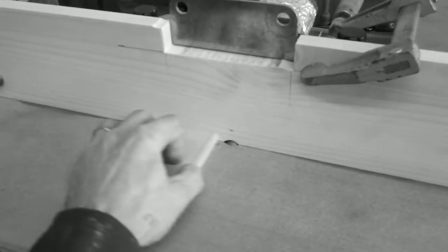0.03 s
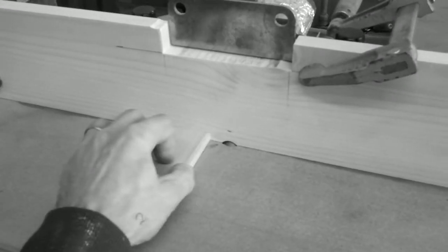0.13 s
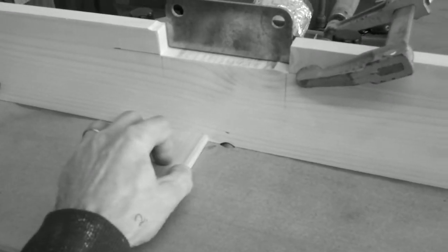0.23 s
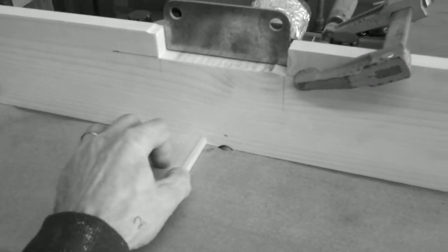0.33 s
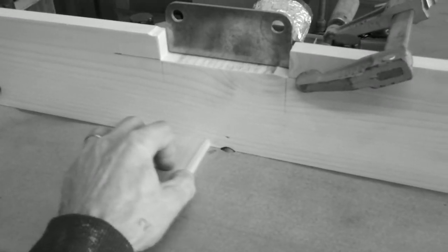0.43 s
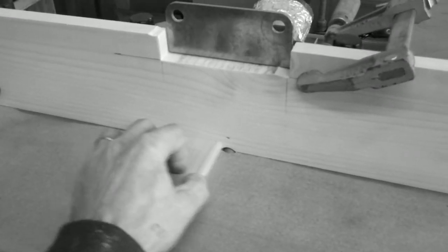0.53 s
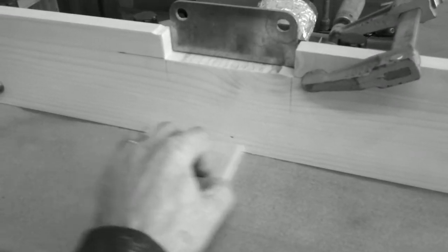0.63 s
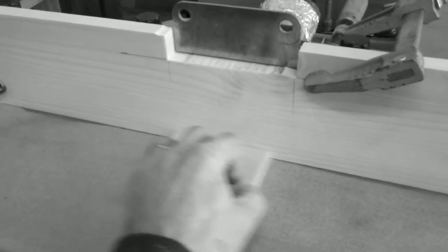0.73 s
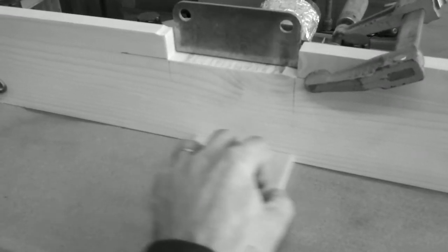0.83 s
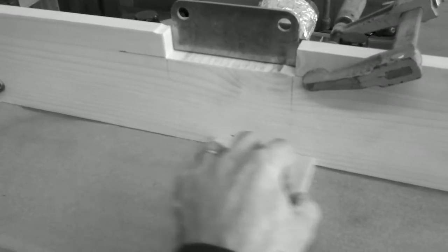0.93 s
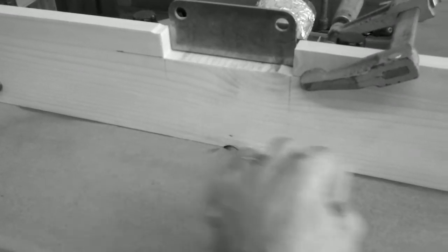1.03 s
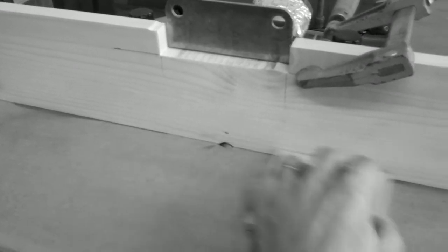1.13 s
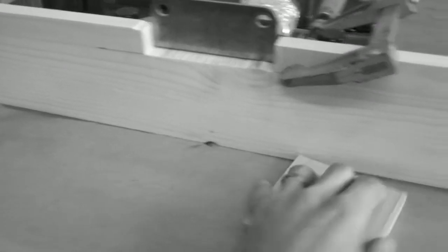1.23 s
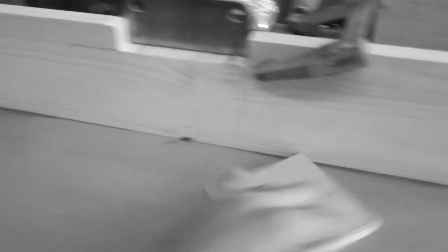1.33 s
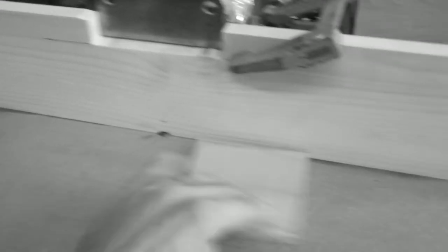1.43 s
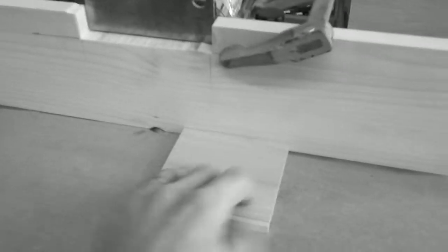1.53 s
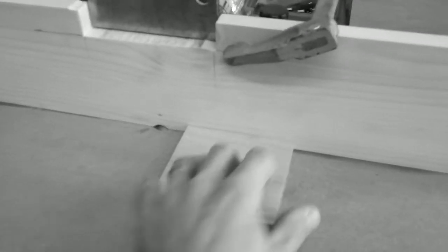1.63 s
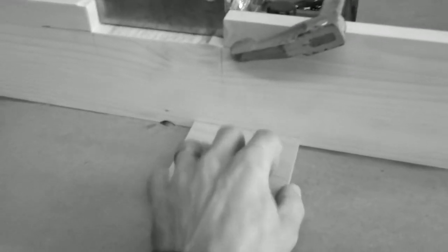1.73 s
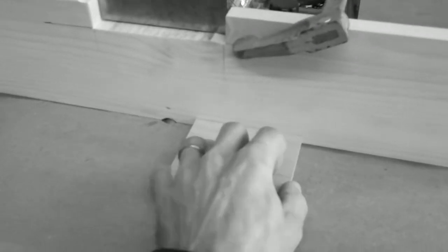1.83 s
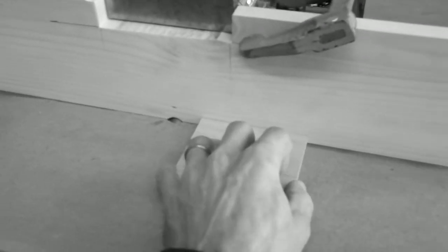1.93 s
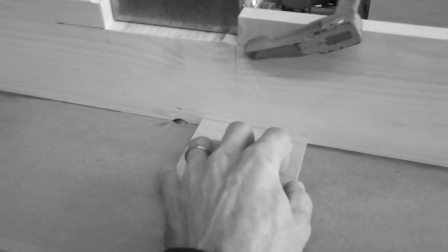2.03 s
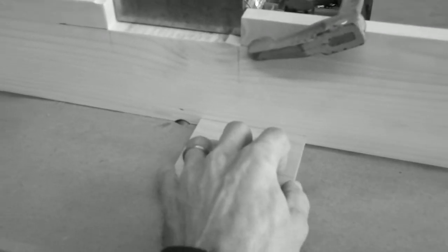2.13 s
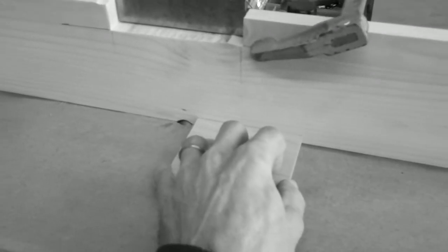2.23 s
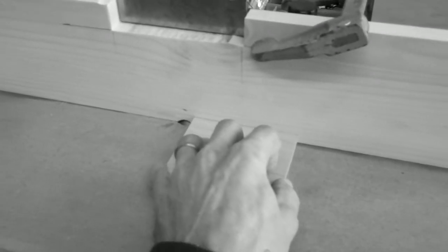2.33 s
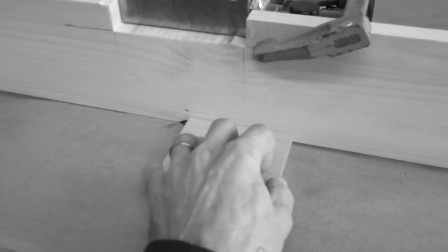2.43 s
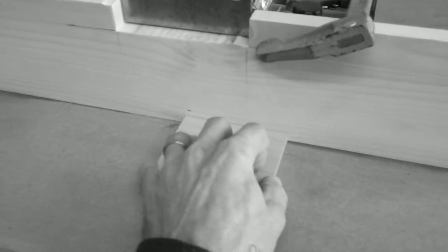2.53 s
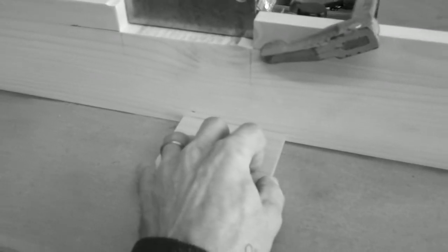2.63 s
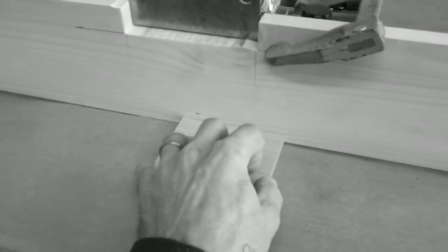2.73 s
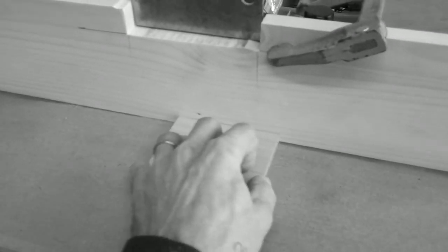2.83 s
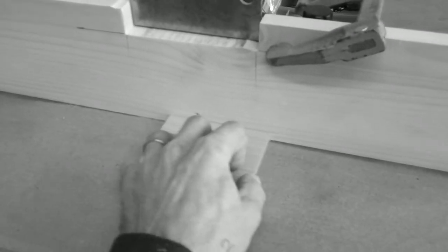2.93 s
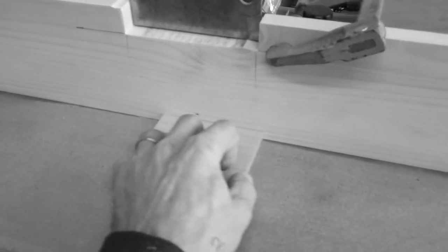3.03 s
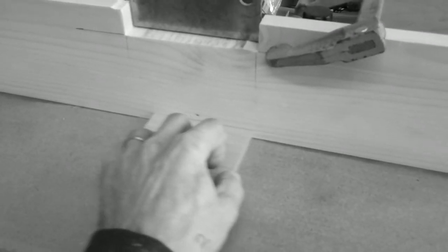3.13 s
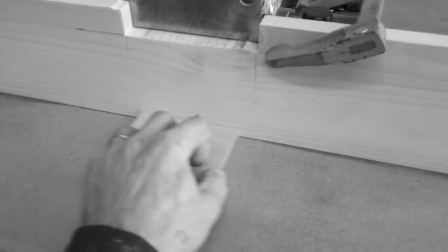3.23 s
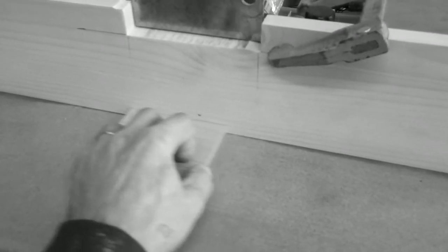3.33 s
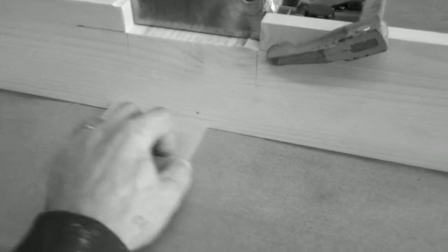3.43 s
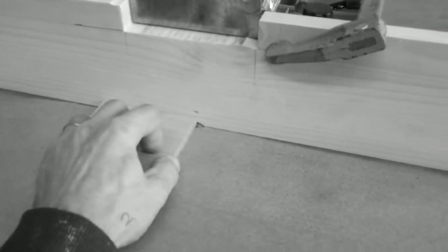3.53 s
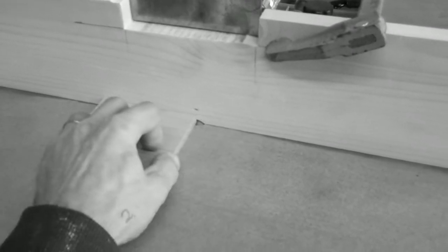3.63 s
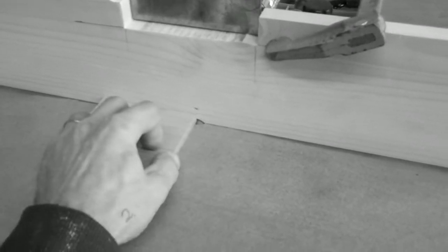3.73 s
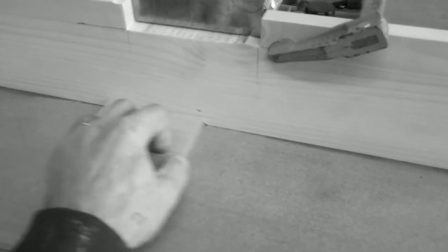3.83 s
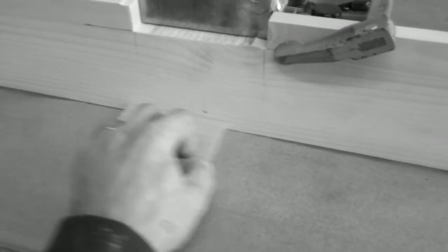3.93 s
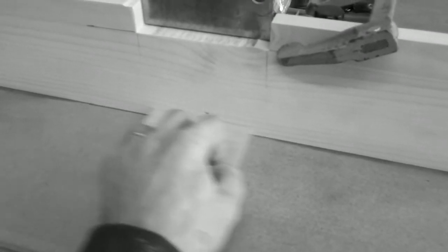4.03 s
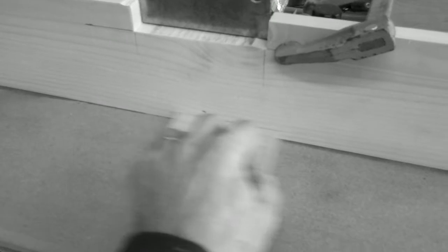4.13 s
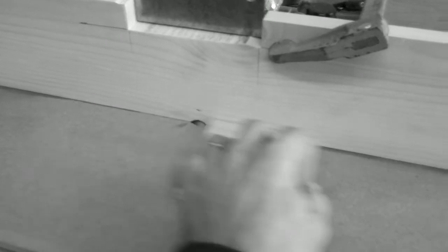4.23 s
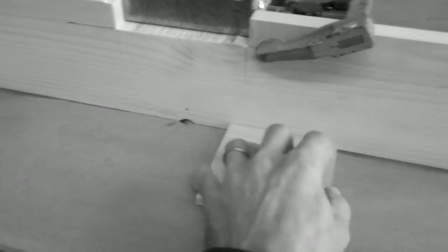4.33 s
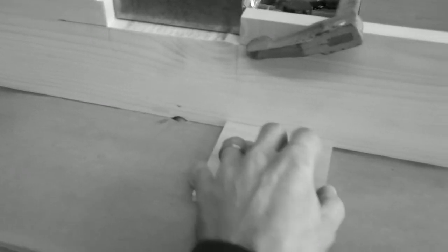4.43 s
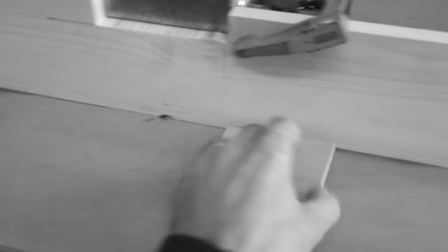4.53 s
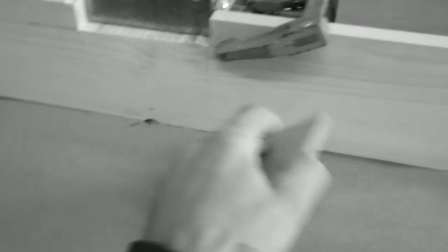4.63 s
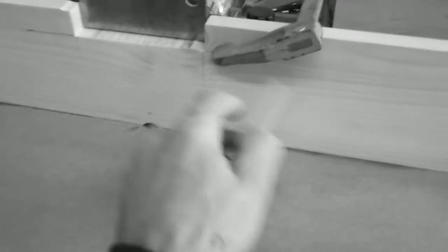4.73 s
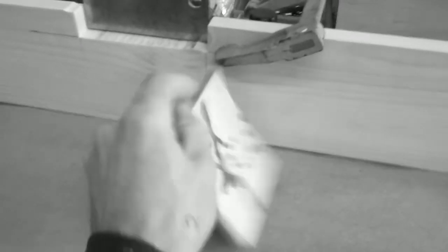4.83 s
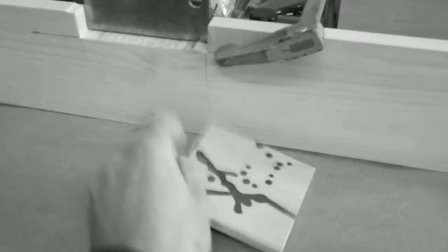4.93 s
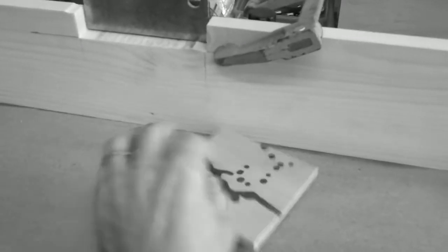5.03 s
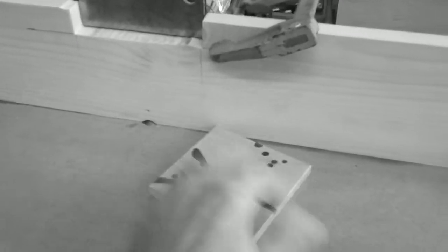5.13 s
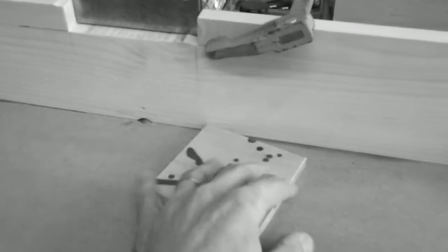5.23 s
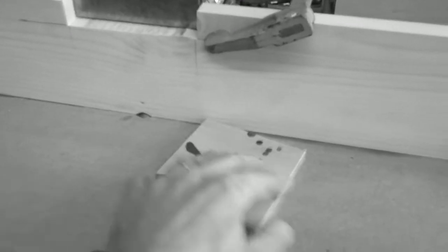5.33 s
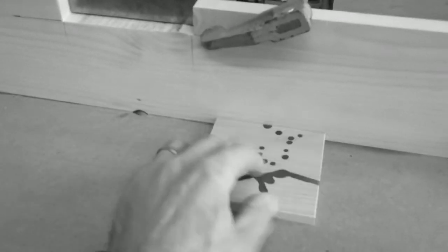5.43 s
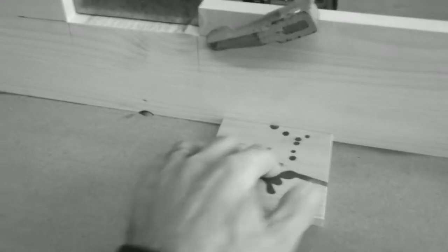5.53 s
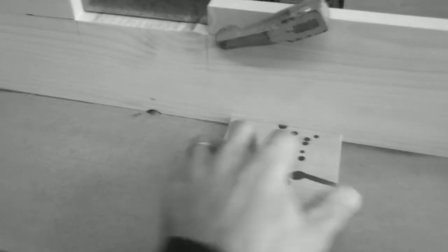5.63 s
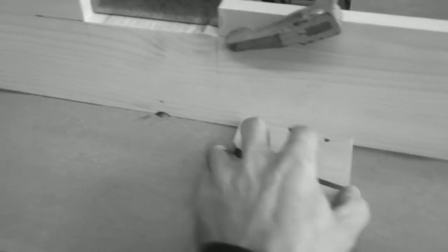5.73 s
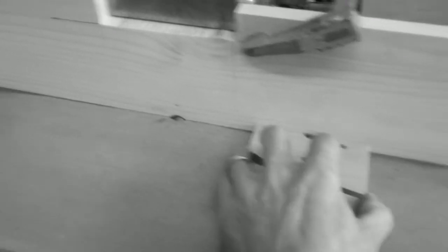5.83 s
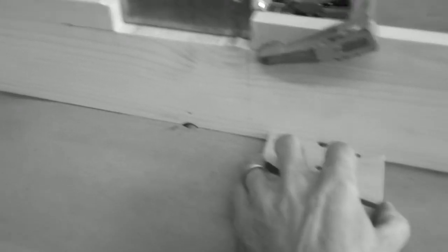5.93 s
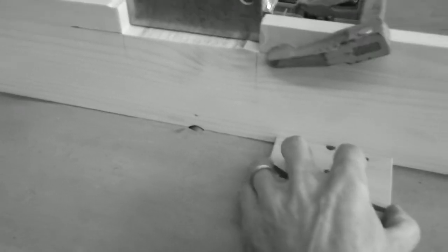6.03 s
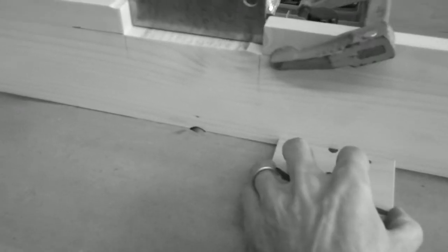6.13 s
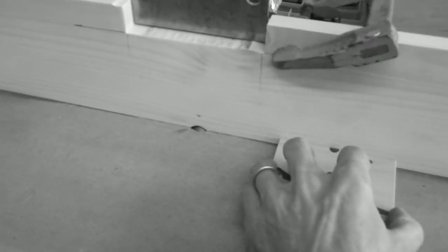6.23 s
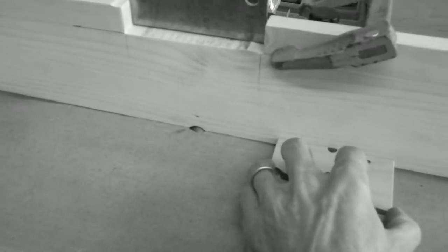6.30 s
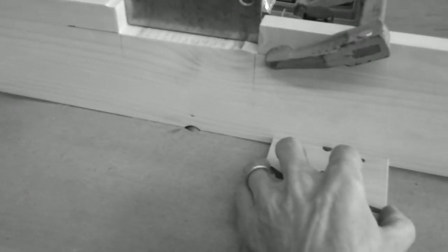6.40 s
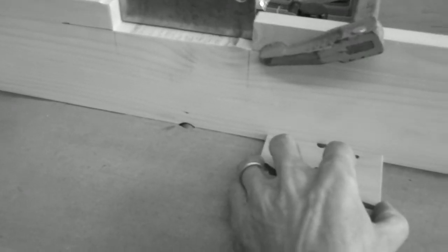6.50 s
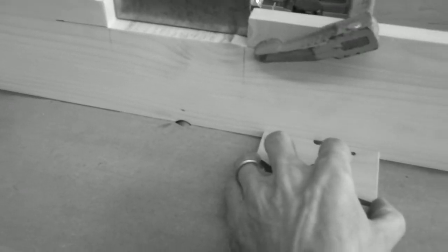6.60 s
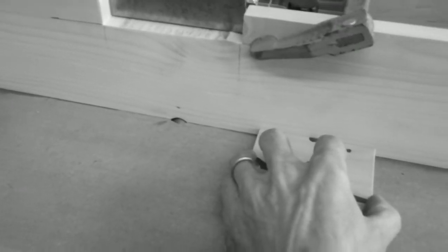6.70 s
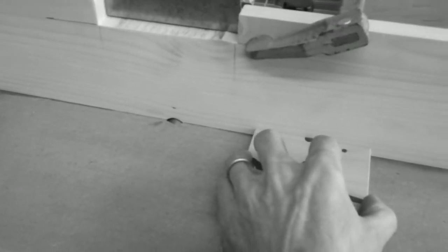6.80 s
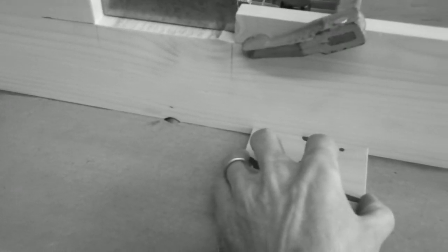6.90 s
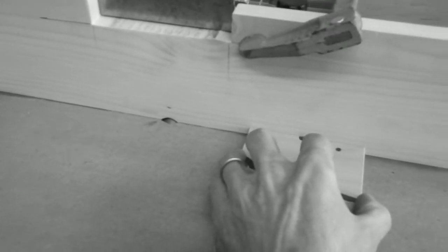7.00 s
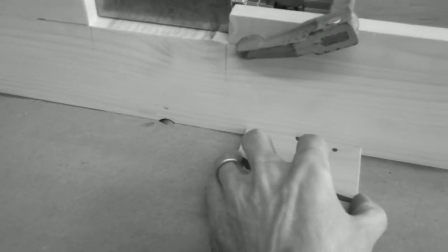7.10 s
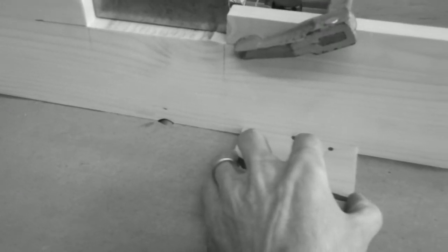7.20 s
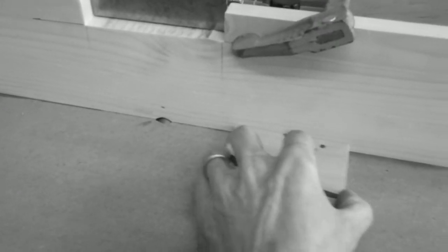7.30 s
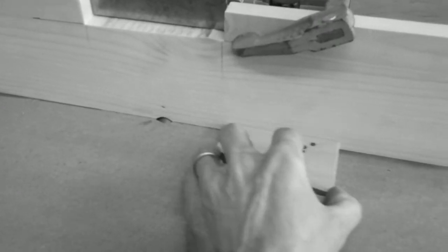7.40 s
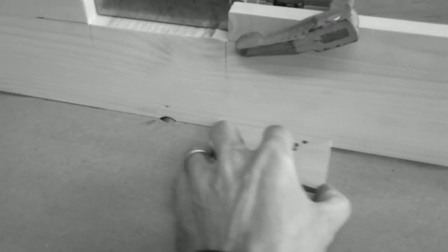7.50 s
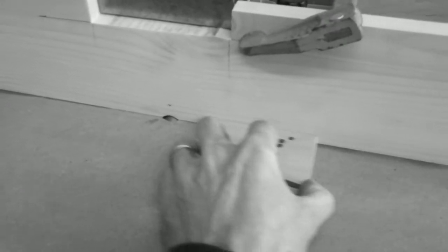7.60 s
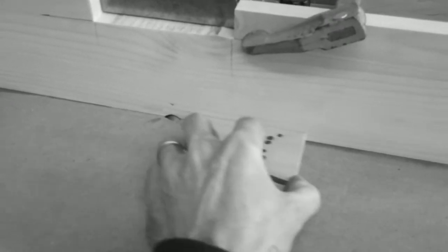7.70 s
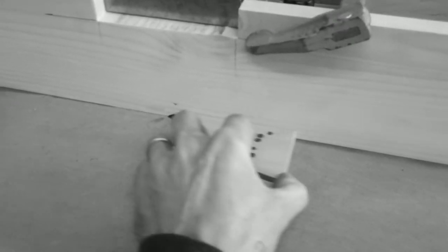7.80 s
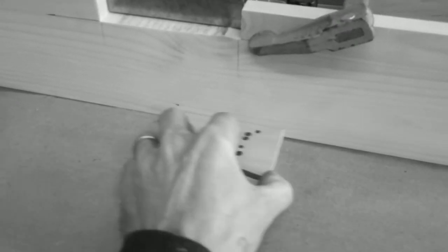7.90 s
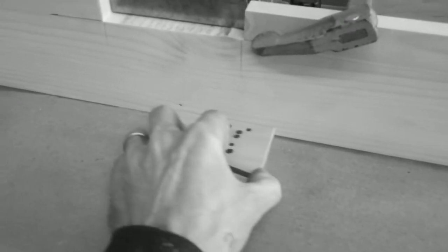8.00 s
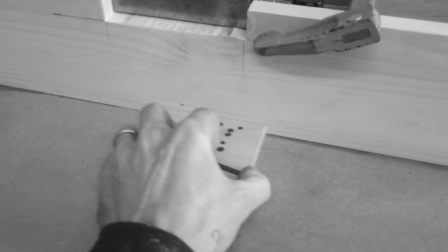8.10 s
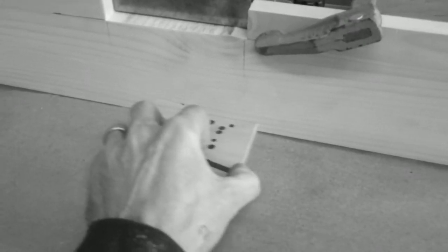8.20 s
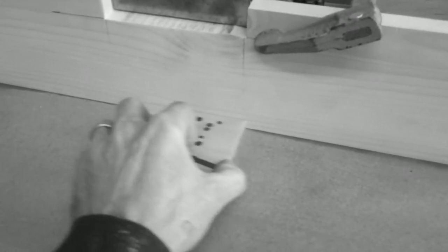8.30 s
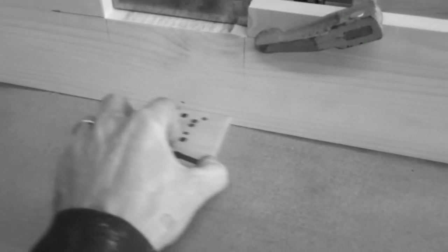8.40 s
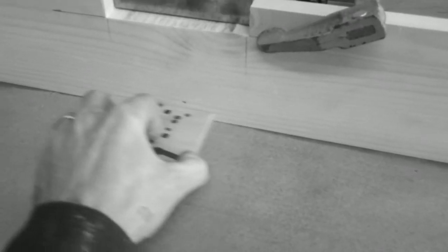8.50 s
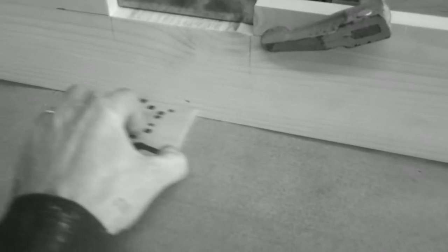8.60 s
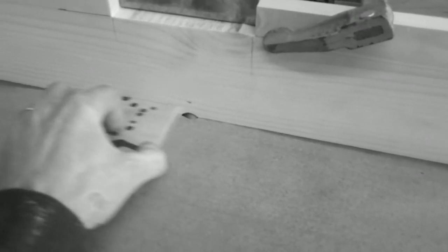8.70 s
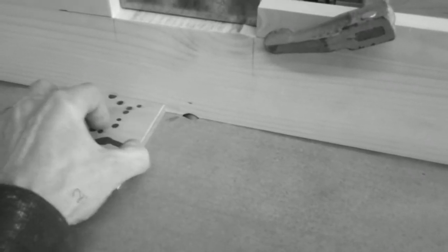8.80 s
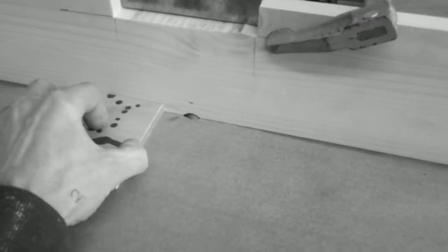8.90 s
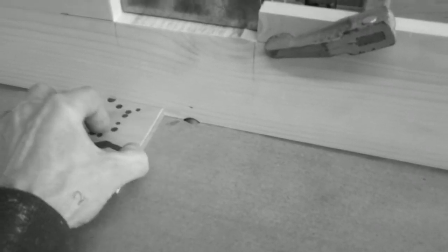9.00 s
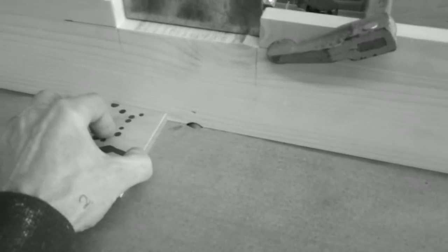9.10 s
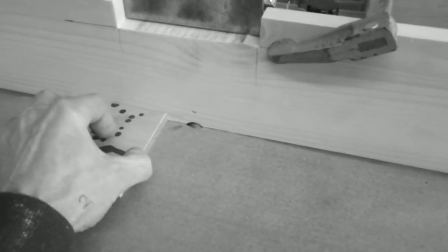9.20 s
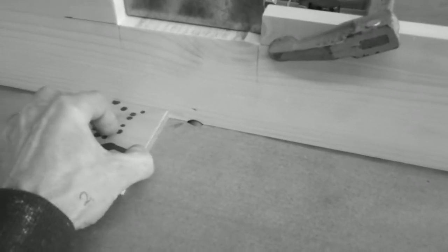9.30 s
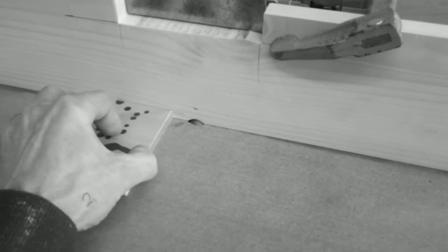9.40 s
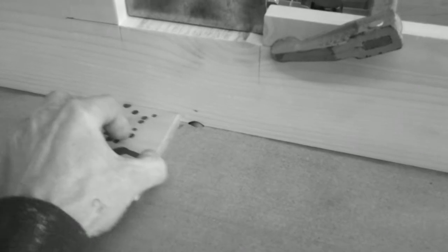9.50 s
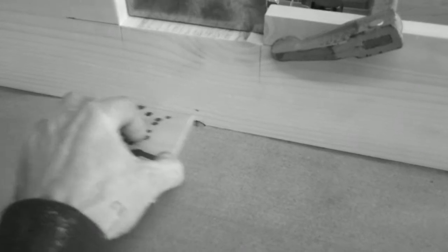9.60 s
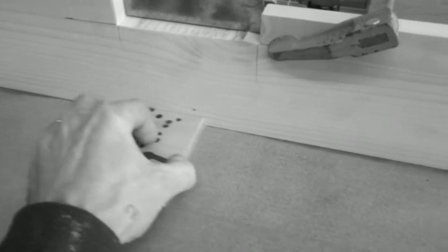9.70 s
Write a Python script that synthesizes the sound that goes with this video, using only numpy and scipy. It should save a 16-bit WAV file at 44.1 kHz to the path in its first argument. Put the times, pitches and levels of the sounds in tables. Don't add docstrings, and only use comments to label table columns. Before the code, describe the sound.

A constant electric motor drone, low roar with piercing steady tones and airy hiss, fills a workshop. Small wood pieces scrape lightly along the table, buzz brightly as the cutter bites, and clack against fence and table. The handheld camera microphone is close; loud knocks distort slightly and duck the level, which creeps back over a few seconds.

```python
import sys
import numpy as np
from scipy import signal
from scipy.io import wavfile
from scipy.ndimage import uniform_filter1d

SR = 44100
rng = np.random.default_rng(int(sys.argv[2]) if len(sys.argv) > 2 else 0)


def put_to_file(sound):
    columns = np.atleast_2d(sound).T
    safe = np.clip(columns, -1, 1)
    whole_steps = np.round(safe * 32767)
    wavfile.write(sys.argv[1], SR, whole_steps.astype(np.int16))


def linear_from_db(decibels):
    return 10 ** (np.asarray(decibels, float) / 20)


N = 429975

# time_s, shaft_turns_per_s
SHAFT_SPEED = [(0.0, 207.05), (0.35, 207.42), (1.2, 207.47), (1.5, 207.8), (2.4, 207.45), (2.7, 207.1),
               (3.0, 206.56), (3.3, 206.32), (3.6, 206.44), (3.9, 207.06), (5.0, 207.05), (5.4, 207.35),
               (5.7, 207.22), (7.1, 207.43), (7.8, 207.2), (8.55, 207.0), (9.3, 207.54), (9.75, 207.43)]
# time_s, push (0-1)
FENCE_PUSH = [(0, 1), (.75, 1), (1.1, 0.93), (1.45, 0.74), (2.1, .7), (2.75, 0.9), (3.3, 1), (3.55, 0.9),
              (4.05, 1), (4.75, 0.76), (4.97, 0.65), (5.06, 0), (5.25, 0.5), (6.0, 0.78), (7.3, 0.78),
              (8.45, 0.95), (8.75, 0.88), (9.5, 1)]
# time_s, bite_db, edge_sizzle_db, ringing_zone_of_block_hz
CUT_CURVES = [
    [(.5, -48, -47, 8000), (.66, -33, -40, 6600), (.76, -36, -37, 5930), (.85, -30, -33, 6060),
     (.995, -42, -32.5, 6850)],
    [(2.47, -33, -30, 6200), (2.51, -26.5, -27.5, 6360), (2.63, -27, -36, 6500), (3.16, -23.5, -34, 6500),
     (3.29, -26.5, -38, 6500), (3.37, -24, -34.5, 7060), (3.5, -27, -32, 7400), (3.535, -39, -30, 7300)],
    [(3.535, -36, -49, 7300), (3.68, -43, -50, 7350), (3.78, -39.5, -49, 7350), (3.87, -41, -47, 7700)],
    [(7.88, -25, -27.5, 6800), (7.92, -25.5, -34.5, 6400), (8.11, -25, -40.5, 7160),
     (8.4, -28.5, -43, 7500), (8.52, -30, -40, 6800), (8.63, -25.5, -33, 6960), (8.66, -38, -39, 6800)],
    [(9.615, -31, -34, 6670), (9.641, -29.5, -29.5, 6680), (9.75, -39, -32.5, 6300)],
]
# edge_phase_drift (half turns), drone_of_block_on_fence_db, one_edge_biting_deeper_db
CUT_BLOCKS = [
    (1.54, -3.5, -10),
    (1, -1, -8.5),
    (0.88, 10.5, -16),
    (0.48, -4, -10.5),
    (1.6, 3, -6),
]


def evened(x):
    return x / np.sqrt(np.mean(x ** 2) + 1e-20)


def between(ends, share):
    return ends[0] + (ends[1] - ends[0]) * share


def filtered(x, order, hz, kind):
    return signal.sosfilt(signal.butter(order, hz, kind, fs=SR, output="sos"), x)


def read(points, hz):
    f, value = np.transpose(points)
    return np.interp(np.log(hz + 1), np.log(f + 1), value)


def curves(rows):
    s, *columns = np.transpose(rows)
    return [np.interp(np.arange(N) / SR, s, c) for c in columns]


def wander(count, length, seconds):
    knots = np.arange(0, length / SR + 2 * seconds, seconds)
    values = rng.standard_normal((count, 400))[:, :len(knots)]
    t = np.arange(length) / SR
    return np.array([np.interp(t, knots, v) for v in values]) * 1.1


def noise(spectrum, ripple_db, patchy_db):
    hz = np.fft.rfftfreq(2048, 1 / SR)
    a, b, patches = rng.standard_normal((N // 512 + 5, 1025, 3)).T
    patches = uniform_filter1d(patches, size=15, axis=0)
    patches = evened(uniform_filter1d(patches, size=8, axis=1))
    ripple = uniform_filter1d(rng.standard_normal(1025), size=2)
    ripple = evened(ripple - uniform_filter1d(ripple, size=9))
    colour_db = read(spectrum, hz) + ripple_db * ripple
    z = (a + 1j * b) * linear_from_db(colour_db[:, None] + patchy_db * patches)
    return evened(signal.istft(z, nperseg=2048, noverlap=1536)[1][:N])


def tones(cycles, levels_db, waver_db):
    drift = wander(len(cycles), N // 32 + 1, .12 / 32)
    out = np.zeros(N)
    for c, db, d in zip(cycles, levels_db, drift):
        level_db = np.broadcast_to(db, N)[::32] + waver_db * d[:(N + 31) // 32]
        level = np.repeat(linear_from_db(level_db), 32)[:N]
        phase = (c + rng.random()) % 1
        out += level * np.cos(np.float32(2 * np.pi * phase))
    return np.sqrt(2) * out


def fan_hiss(turns):
    # pitch_hz, level_db per Hz
    hiss_curve = [(2120, -30), (3600, -6.5), (3860, -34), (3950, -34.5), (4450, -11), (6120, -7.5),
                  (6980, -4), (10100, -10), (12200, -16), (15100, -7.5), (15900, -11.5)]
    # lifted_db, pushed_db
    hiss_db = (-47, -40)
    level = linear_from_db(between(hiss_db, curves(FENCE_PUSH)[0]))
    puffs = 1 + .2 * np.cos(4 * np.pi * turns)
    return level * puffs * noise(hiss_curve, ripple_db=2.5, patchy_db=1.6)


def sliding_blocks():
    # start_s, length_s, level_db, zone_hz
    slide_strokes = [(0.609, .14, -41, 9100), (.66, 0.24, -47, 6500), (1.097, 0.49, -47, 7660),
                     (3.55, 0.34, -53, 7500), (4.086, 0.17, -42, 7050), (4.47, 0.15, -45, 6030),
                     (4.68, 0.36, -45.5, 7500), (4.49, 0.11, -32, 2750)]
    out = np.zeros(N)
    for s, length, db, hz in slide_strokes:
        grit = rng.standard_normal(SR // 2)[:round(length * SR)]
        scuff = filtered(grit, 3, [.84 * hz, 1.12 * hz], "band")
        roughness_db = 1.9 * wander(1, len(grit), 0.0143)[0]
        stroke = signal.windows.tukey(len(grit), .6) * linear_from_db(db + roughness_db)
        out[round(s * SR):][:len(grit)] += stroke * evened(scuff)
    return out


def roar(turns, mains):
    # pitch_hz, level_db per Hz
    roar_curve = [(30, -38), (100, -23.5), (190, -11), (275, -13.5), (400, -2.5), (560, -7), (1000, -1),
                  (1500, -2), (2150, 0), (2450, -4.5), (2900, -10.5), (3700, -15), (4200, -25), (6000, -42)]
    beat = 1 + 0.2 * np.cos(2 * np.pi * turns) + 0.048 * np.cos(2 * np.pi * mains)
    return linear_from_db(14) * beat * noise(roar_curve, ripple_db=3.2, patchy_db=.7)


def octave_beat_db():
    edge_share = 0.47
    t, out = np.arange(N) / SR, np.zeros(N)
    for rows, block in zip(CUT_CURVES, CUT_BLOCKS):
        along = (t - rows[0][0]) / (rows[-1][0] - rows[0][0])
        inside = (along > 0) & (along < 1)
        edge = edge_share * np.exp(1j * np.pi * block[0] * along[inside])
        out[inside] = 20 * np.log10(abs(1 + edge) + 0.017)
    return uniform_filter1d(out, size=2000)


def shaft_tones(turns):
    shaft_db = [-13, -20, -11, -15, -15, -11, -13, -12, -22, -11, -25, -19, -14, -21, -27, -16, -28, -28]
    push = curves(FENCE_PUSH)[0]
    unbalance_db = between((-2.5, 10.5), push)
    octave_db = between((0.5, 6), push) + octave_beat_db()
    low = tones([turns, 2 * turns], [unbalance_db, octave_db], waver_db=0.87)
    high = tones([k * turns for k in range(3, 21)], shaft_db, waver_db=2.5)
    return low + linear_from_db(7.5) * high


def bearing_tones(turns, gap):
    race_orders = [(2, 0), (4, 0), (5, 0), (6, 0), (9, 0), (12, 0), (13, 0), (1, 1), (2, -1), (-1, 8),
                   (-1, 10), (10, 0), (11, 0), (15, 0), (17, 0), (18, 0), (19, 0)]
    race_levels = [-3.5, -19.5, -21, -29.5, -23, -21, -24.5, -18, -36, -18, -26, -30, -28, -33, -30, -35,
                   -34]
    loose_orders = [3.218, 15.136]
    loose_levels = [-17, -9]
    slip = turns + 0.00408 * np.cumsum(rng.standard_normal(N)) / np.sqrt(SR) * 10
    balls = 3.6207 * slip
    race = [b * balls + k * turns for b, k in race_orders]
    loose = [k * slip for k in loose_orders]
    ball_db = between((4, 10), gap)
    side_db, third_db = between((-12, 4), gap), between((5, -2), gap)
    out = linear_from_db(8) * tones(race + loose, race_levels + loose_levels, waver_db=0.4)
    out += tones([balls], [ball_db], waver_db=0.87)
    return out + tones([2 * balls + turns, 3 * balls], [side_db, third_db], waver_db=.8)


def commutator_tones(turns, mains, gap):
    slot_levels = [-17, -9, -9.5, -3, -13.5, -15.5, -36]
    slot_rise = [2, 0, 2.5, -0.5, 7.5, -7, -2]
    slot_shade = [-3, 0, 2, 1, -6, -14, -1]
    load = 207.5 - curves(SHAFT_SPEED)[0]
    levels_db = []
    for db, rise, shade in zip(slot_levels, slot_rise, slot_shade):
        levels_db.append(db + rise * load + shade * (gap - .5))
    cycles = [16 * turns + k * mains for k in (-4, -3, -2, -1, 1, 2, 3)]
    return linear_from_db(8) * tones(cycles, levels_db, waver_db=1.1)


def mains_hum(mains):
    hum_levels = [-16, -18, -17, -17]
    return linear_from_db(7.5) * tones([k * mains for k in (3, 15, 16, 17)], hum_levels, waver_db=1.5)


def motor(turns):
    # time_s, opening (0-1)
    hand_gap = [(0, 0), (1.2, 0.87), (2.0, .4), (2.7, 0.7), (3.35, 0.4), (4.2, 1), (5.1, 0.6), (6.1, 0.82),
                (6.8, .9), (7.4, 0.2), (7.95, 0.84), (9.4, .05), (9.75, 0.4)]
    # lifted_db, pushed_db
    load_db = (-2, -0.07)
    gap = curves(hand_gap)[0]
    mains = 120 * np.arange(N) / SR
    out = roar(turns, mains) + shaft_tones(turns) + bearing_tones(turns, gap)
    out += commutator_tones(turns, mains, gap) + mains_hum(mains)
    return linear_from_db(between(load_db, curves(FENCE_PUSH)[0])) * linear_from_db(-40.5) * out


def chips(turns, bite_db, sizzle_db):
    strike_fade = np.exp(-(2 * turns % 1) / 0.21)
    tears = np.diff(rng.standard_normal(len(turns) + 1)) * strike_fade
    bright = filtered(tears, 2, [4200, 9500], "band")
    airy = filtered(tears, 3, 13000, "high")
    return evened(bright + linear_from_db(bite_db - sizzle_db - 15) * airy)


def cut(rows, block, turns):
    # edge_rate_multiple, entering_db, across_the_bit_db, leaving_db
    cutter_shape = [(1, 4, -14, -23), (2, -4.5, -0.5, -4), (3, -3.5, -4.5, -14.5), (4, -1.5, -19.5, -5),
                    (5, -3.5, -1.5, 2), (6, -21, -2.5, -11.5), (7, -35, -35, -30), (8, -14.5, -11.5, -19),
                    (9, -16.5, -16, -19)]
    sizzle_levels = [-19.5, -24, -24.5, -22, -23, -25, -24.5, -22.5, -26.5, -23, -22, -20, -27, -22, -32,
                     -35, -34]
    across = 0.69
    _, drone_db, unequal_db = block
    s, *columns = np.transpose(rows)
    span = np.arange(round(s[0] * SR), min(round(s[-1] * SR), N))
    bite_db, sizzle_db, zone_hz = (np.interp(span / SR, s, c) for c in columns)
    along = np.linspace(0, 1, len(span))
    multiple, *shape_db = np.transpose(cutter_shape)
    drift, buzz = wander(60, len(span), .09), np.zeros(len(span))
    chatter = wander(60, len(span), .05)
    chatter = evened(uniform_filter1d(chatter, size=6, axis=0))
    for k in range(3, 53):
        if k < 19:
            stages_db = [np.interp(k / 2, multiple, e) for e in shape_db]
            level_db = bite_db + np.interp(along, [0, across, 1], stages_db) + drone_db * (k == 4)
        else:
            near = 1 / (1 + ((k * 207 - zone_hz) / 800) ** 2)
            level_db = sizzle_db + 0.8 + 13 * near + 2.5 * chatter[k] + sizzle_levels[(k - 19) // 2]
        level_db = level_db + unequal_db * (k % 2) + (.4 + k / 30) * drift[k]
        buzz += linear_from_db(level_db) * np.cos(2 * np.pi * (k * turns[span] + 0.41 * rng.random()))
    torn = linear_from_db(sizzle_db - 10) * chips(turns[span], bite_db, sizzle_db)
    return span, (np.sqrt(2) * buzz + torn) * signal.windows.tukey(len(span), 600 / len(span))


def wood_modes(t, t60, body_hz, crack_db, crack_hz):
    mode_hz = [620, 820, 1040, 1290, 1700, 2050, 2400, 2950, 3300, 4300, 5900, 6500, 7900, 9500]
    hz = np.array(mode_hz)[:, None] * rng.uniform(.97, 1.03, (len(mode_hz), 1))
    reach = linear_from_db(-9) / (1 + (np.log(hz / body_hz) / 0.34) ** 2)
    reach = reach + linear_from_db(crack_db - 3) / (1 + (np.log(hz / crack_hz) / .2) ** 2)
    sign = (-1) ** np.arange(len(hz))[:, None]
    fade = linear_from_db(-60 * t / (t60 * (1500 / hz) ** 0.15))
    return (sign * reach * fade * np.sin(2 * np.pi * hz * t)).sum(0)


def knock(s, db, body_hz, crack_db, crack_hz):
    t = np.arange(5000) / SR

    def ring(level_db, t60_s, hz, phase=0):
        return linear_from_db(level_db - 60 * t / t60_s) * np.sin(2 * np.pi * hz * t + phase)

    t60 = 0.0099 * np.exp(0.03 * db)
    second_hz = body_hz + 800 if body_hz < 1500 else 0.59 * body_hz
    blow = ring(0, t60, body_hz) + ring(-6.5, 0.75 * t60, second_hz, 2.3)
    blow += ring(-18.5, 0.019, 430) * (body_hz > 1500)
    blow += ring(-24, 4.8 * t60, 1.07 * body_hz)
    modes = wood_modes(t, t60, body_hz, crack_db, crack_hz)
    grit, shop = rng.standard_normal((2, 5000))
    crack = linear_from_db(crack_db) * grit * (t / 0.00013) * np.exp(-t / 0.00022)
    bright_hz = np.clip(7500 * 2 ** ((db + crack_db) / 12), 4000, 18000)
    crack = filtered(crack, 2, bright_hz, "low")
    shop = linear_from_db(-5.5 - 60 * t / 0.03) * filtered(shop, 4, [600, 3300], "band")
    rise = 1 - np.exp(-(t / 0.00099) ** 2)
    return round(s * SR), linear_from_db(db) * (rise * (1.42 * blow + modes + shop) + crack)


def shove(db):
    return linear_from_db(db) * np.exp(-((np.arange(300) / SR - .0025) / 0.0009) ** 2)


def scene():
    # time_s, peak_db, struck_zone_hz, crack_relative_db, crack_zone_hz
    knock_events = [(1.277, -6.5, 950, -32, 6850), (1.458, 6.5, 1037, -11, 4400),
                    (1.4595, 3, 1685, -15, 8500), (1.477, -0.5, 1140, -35, 6890),
                    (4.119, -35, 1490, -11, 7460), (4.189, -16.5, 1480, 10, 6550),
                    (4.619, -18, 1530, -27, 9000), (4.882, -3.5, 1380, -30, 6420),
                    (4.977, -4.5, 2300, 13, 7750), (4.978, -6, 3760, -20, 5000),
                    (5.011, 8, 1980, -16, 5900), (5.033, 2, 3230, -20, 4470), (5.045, -1, 2340, 1.5, 7200),
                    (5.056, -2, 2060, -4, 4550), (5.0793, -2.5, 1960, -4, 5800),
                    (5.101, -0.5, 3300, -12, 6450), (5.113, -4, 3300, -3, 5740),
                    (5.12, -3.5, 3450, -15, 4500), (5.135, -18, 2010, -18, 4770),
                    (5.147, -11.5, 3060, -1, 5600), (5.151, -4.5, 1680, -33, 4640),
                    (5.408, 13, 1200, -19, 4670), (5.4255, 3, 1080, -42, 6500),
                    (5.4275, 7.5, 1310, -35, 4200)]
    # time_s, level_db
    shove_events = [
        (1.458, -35),
        (4.979, -21.5),
        (5.408, -23),
    ]
    turns = np.cumsum(curves(SHAFT_SPEED)[0]) / SR
    mix = np.pad(fan_hiss(turns) + sliding_blocks() + motor(turns), (0, 5000))
    for rows, block in zip(CUT_CURVES, CUT_BLOCKS):
        span, sound = cut(rows, block, turns)
        mix[span] += sound
    for row in knock_events:
        at, sound = knock(*row)
        mix[at:at + 5000] += filtered(sound, 2, 250, "high")
    for s, db in shove_events:
        mix[round(s * SR):][:300] += shove(db)
    return mix[None, :N]


def gain_db():
    # time_s, gain_db it falls to
    duck_events = [(0, -2.5), (1.466, -7.5), (1.495, -10.5), (4.984, -8), (5.02, -6), (5.09, -9.5),
                   (5.16, -11.5), (5.435, -12.5)]
    fall_s, recover_db_per_s, quicken_db_per_s2 = 0.0044, 3, 0.0156
    t = np.arange(N) / SR
    paths = []
    for s, db in duck_events:
        climb = db + recover_db_per_s * (t - s) + quicken_db_per_s2 * (t - s) ** 2
        paths.append(np.where(t >= s, np.minimum(climb, 0), 0))
    aim = np.min(paths, axis=0)
    hold = np.exp(-1 / (fall_s * SR))
    return signal.lfilter([1 - hold], [1, -hold], aim - aim[0]) + aim[0]


def top_cut(x):
    return signal.sosfilt(signal.butter(12, 16690, fs=SR, output="sos"), x)


def record(dry):
    x = filtered(dry * linear_from_db(gain_db()), 2, 65, "high")
    x = x / (1 + (x / .76) ** 8) ** (1 / 8)
    edge = signal.firwin(801, 15780, window=("kaiser", 9), fs=SR)
    return top_cut(signal.oaconvolve(x, edge[None], "same"))


dry = scene()
out = record(dry)
put_to_file(out)
```